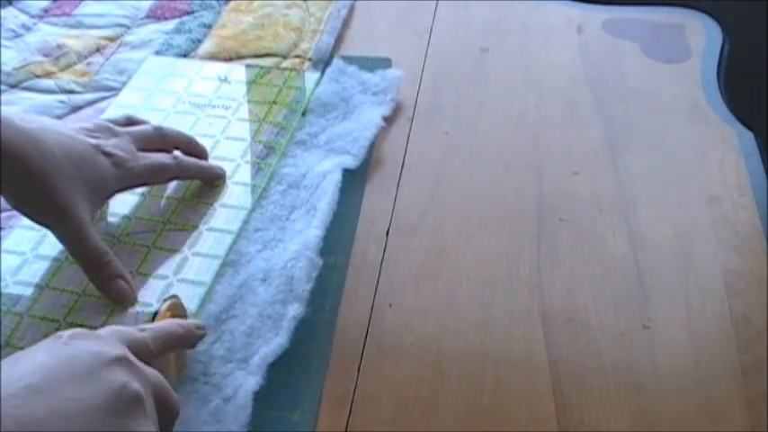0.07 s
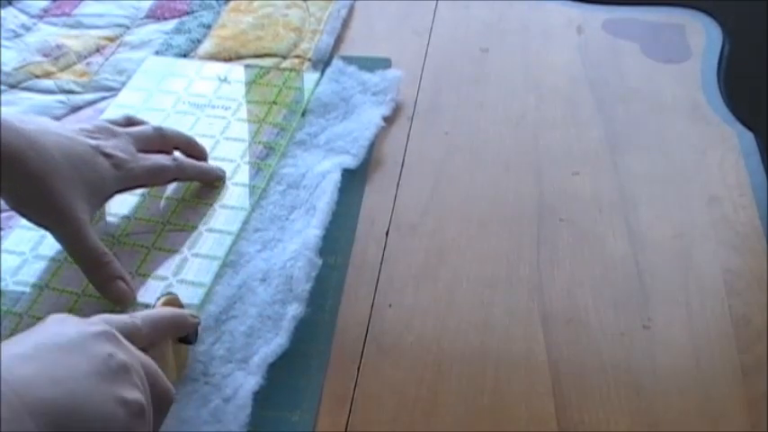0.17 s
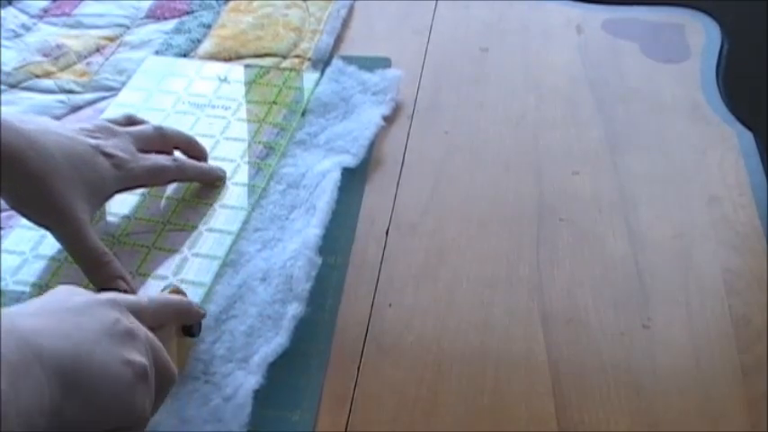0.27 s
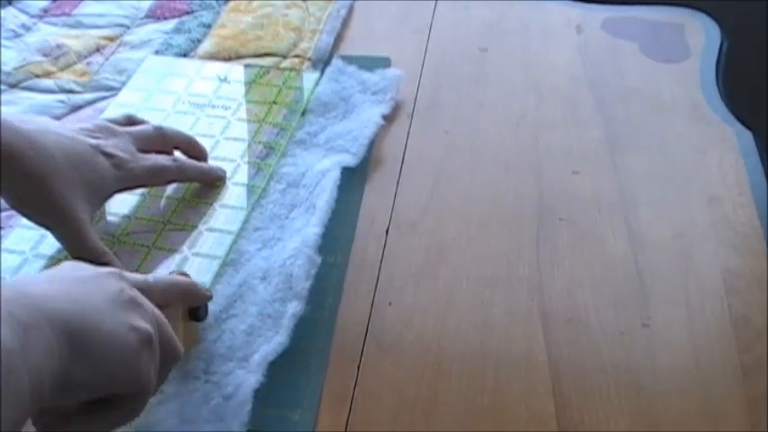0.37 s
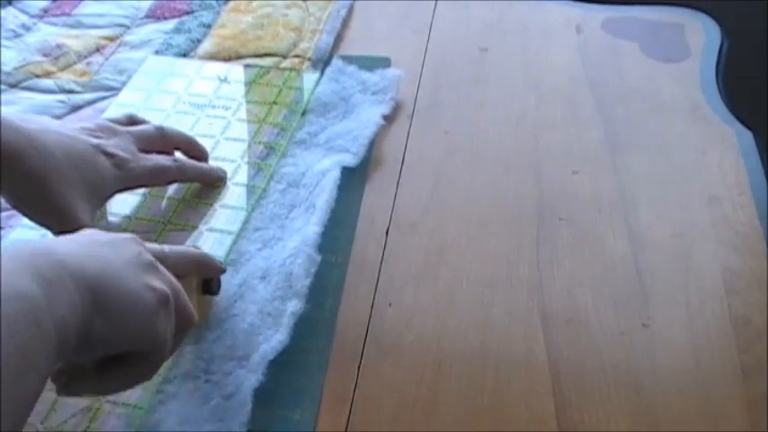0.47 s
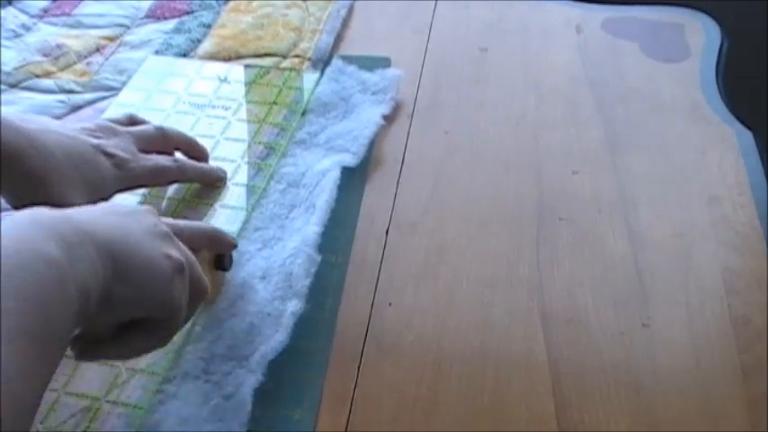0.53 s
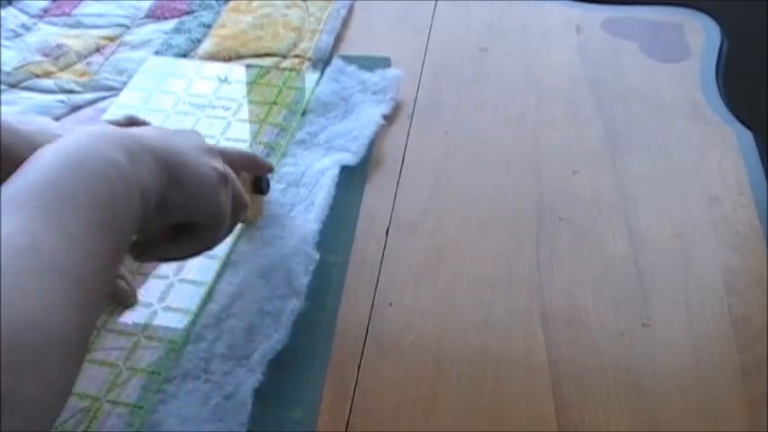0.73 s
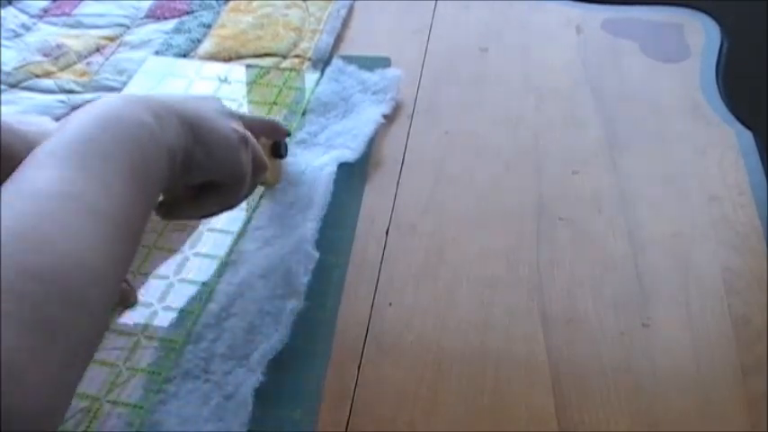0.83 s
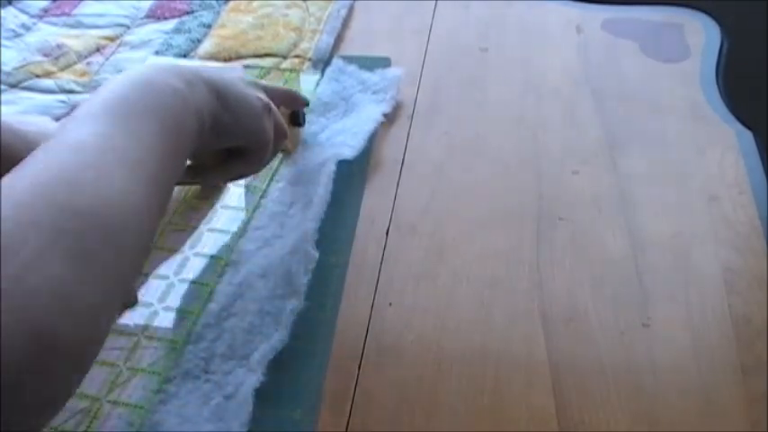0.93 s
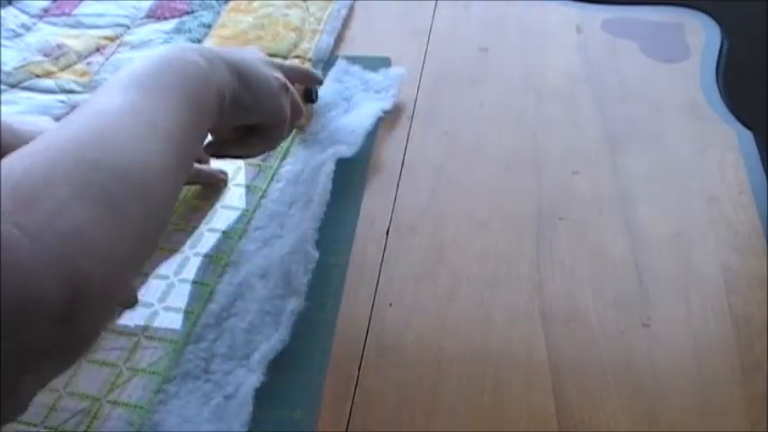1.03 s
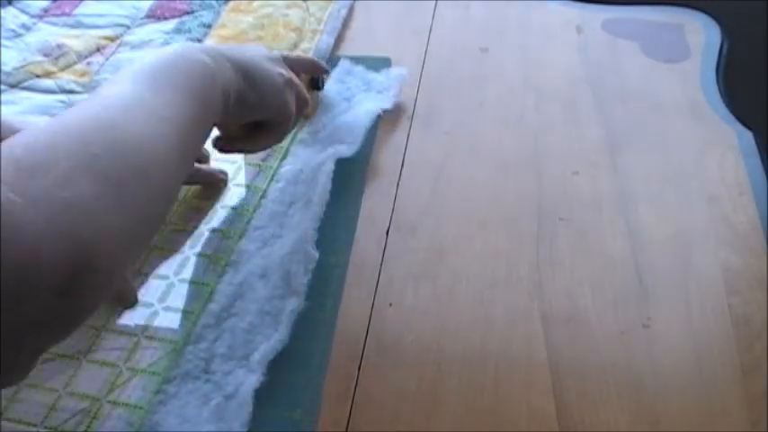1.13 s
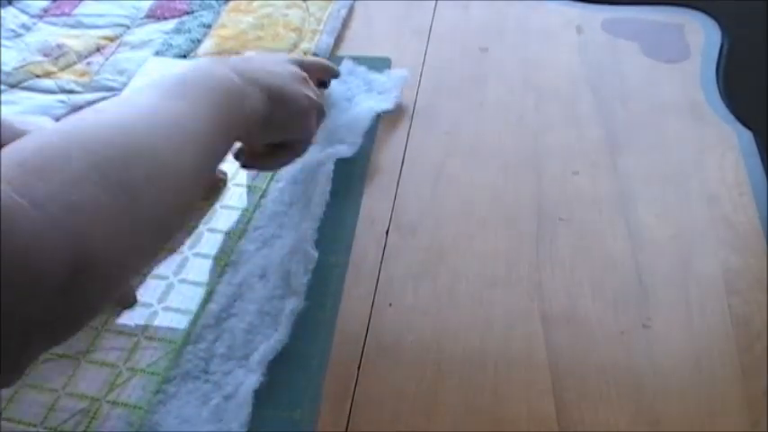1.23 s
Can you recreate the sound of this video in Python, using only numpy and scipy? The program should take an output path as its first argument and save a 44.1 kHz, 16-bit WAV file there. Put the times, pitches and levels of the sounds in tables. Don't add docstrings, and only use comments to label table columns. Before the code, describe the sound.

One rasping rotary cutter stroke: tiny handle ticks, a soft bouncing knock, then gritty fibre snaps ringing ruler and mat before dying away, heard close in a small quiet room with a thin motor whine.

```python
import sys
import numpy as np
from scipy import signal
from scipy.fft import rfft, irfft, next_fast_len
from scipy.io import wavfile
from scipy.ndimage import uniform_filter1d

SR = 44100
rng = np.random.default_rng(int(sys.argv[2]) if len(sys.argv) > 2 else 0)


def invert_db(level):
    return 10 ** (np.asarray(level, dtype=float) / 20)


def master(y):
    cut = np.clip(np.atleast_2d(y).T, -1, 1)
    pcm = np.round(cut * 32767)
    wavfile.write(sys.argv[1], SR, pcm.astype(np.int16))


N = 57330

# t/s, level/dB
KNOCKS = [
    (.2078, -29),
    (0.2219, -39.5),
    (0.2305, -48),
    (0.2422, -45.5),
    (0.2515, -55),
]
EAR_TILT = invert_db(1.07 * np.array([[1], [-1]]))


def evened(x):
    return x / np.sqrt(np.mean(x ** 2) + 1e-20)


def read(points, hz):
    f, value = np.transpose(points)
    return np.interp(np.log(hz + 1), np.log(f + 1), value)


def colour(x, points):
    log_gain = np.log(invert_db(read(points, np.fft.rfftfreq(2048, 1 / SR))))
    full = np.r_[log_gain, log_gain[-2:0:-1]]
    taps = np.fft.ifft(np.exp(np.conj(signal.hilbert(full)))).real
    taps = taps.reshape((1,) * (x.ndim - 1) + (-1,))
    return signal.oaconvolve(x, taps, axes=-1)[..., :N]


def resonate(x, hz, width):
    turn = np.exp(2j * np.pi * np.cumsum(hz * np.ones(len(x))) / SR)
    r = np.exp(-np.pi * width / SR)
    return 2 * (turn * signal.lfilter([1 - r], [1, -r], x / turn)).real


def hiss_band(hz, width):
    noise = rng.standard_normal(N)
    return evened(resonate(resonate(noise, hz, width), hz, width))


def drift(seconds):
    size = max(int(seconds * SR), 2)
    smooth = uniform_filter1d(rng.standard_normal(N), size)
    return evened(uniform_filter1d(smooth, size))


def snaps(per_s, spread_db):
    hit = rng.random(N) < per_s / SR
    size_db = spread_db * np.minimum(rng.exponential(1, N), 3.2)
    return evened(hit * rng.standard_normal(N) * invert_db(size_db))


def burst(s, length):
    t = np.arange(N) / SR - s
    return (t >= 0) * np.exp(-np.maximum(t, 0) / length)


def swell(s, length):
    t = np.arange(N) / SR
    return np.exp(-((t - s) / length * 2) ** 2)


def no_bass(x, cut_hz):
    return signal.sosfilt(signal.butter(2, cut_hz, "high", fs=SR, output="sos"), x)


def air():
    # f/Hz, level/dB
    hiss_curve = [(30, -25), (120, -14), (400, -7.5), (1100, -11), (1500, -17), (3500, -20.5),
                  (7500, -25.5), (15500, -40.5)]
    # f/Hz, likeness (-1 to 1)
    likeness = [(60, -0.41), (240, 0.052), (950, -0.46), (3770, 0.33), (15000, -0.037)]
    hz = np.fft.rfftfreq(N, 1 / SR)
    a, b = rfft(rng.standard_normal((2, N)))
    same = np.clip(read(likeness, hz), -1, 1)
    pair = np.array([a, same * a + np.sqrt(1 - same ** 2) * b])
    hiss = evened(irfft(pair * invert_db(read(hiss_curve, hz)), N))
    whine = invert_db(-68) * hiss_band(1084, 18)
    return invert_db(-57.5) * hiss * EAR_TILT + whine


def room(x):
    # f/Hz, level/dB
    echo_curve = [(200, -13), (1000, -7.5), (3000, -13), (6000, -9), (9000, -5.5), (11500, -6),
                  (14000, -21)]
    t60_s, shared = 0.18, 0.8
    count, gap = SR // 120, 20
    taps = np.zeros((2, count * gap + 100))
    at = 30 + np.arange(count) * gap + rng.integers(0, gap, (2, count))
    np.put_along_axis(taps, at, rng.choice([-1., 1.], at.shape), 1)
    apart = np.sqrt(1 - shared ** 2) * taps[1] * np.array([[1], [-1]])
    taps = shared * taps[0] + apart
    taps *= invert_db(-60 * np.arange(taps.shape[1]) / SR / t60_s)
    taps /= np.linalg.norm(taps[0])
    return colour(signal.fftconvolve(x[None], taps, axes=1)[:, :N], echo_curve)


def ticks():
    # t/s, level/dB, f/Hz, width/Hz
    clicks = [(.0015, -48.5, 5300, 2500), (.0062, -52, 6560, 1800), (.0085, -53, 4630, 900),
              (0.009, -48.5, 7140, 1180), (.06, -55.5, 3320, 2500), (.058, -56, 705, 603),
              (0.078, -59, 5000, 4050), (0.096, -60, 3100, 1230), (0.177, -62, 3330, 1310),
              (1.295, -59.5, 2800, 900), (1.296, -62, 300, 300), (0.218, -52.5, 7050, 2500)]
    return sum(invert_db(db) * burst(s, .0022) * hiss_band(hz, width) for s, db, hz, width in clicks)


def thread():
    click = -invert_db(-19) * (np.arange(N) == round(1.0443 * SR))
    return resonate(click, 4100, 3600) + resonate(click, 2300, 2100)


def squeaks():
    times = [.32, .5, .58, .64, .815, .912, .937, .945, 1.18]
    # length/s, f/Hz, width/Hz, level/dB
    hisses = [(0.093, 7300, 900, -67), (0.23, 7450, 2000, -62), (0.012, 6600, 1400, -59),
              (0.024, 5330, 200, -62), (0.013, 6100, 1160, -49), (0.025, 8900, 1500, -51),
              (0.011, 9240, 1400, -43.5), (0.039, 8000, 4300, -47.5), (0.16, 7800, 4500, -67)]
    return sum(invert_db(db) * swell(s, length) * hiss_band(hz, width)
               for s, (length, hz, width, db) in zip(times, hisses))


def knock():
    # f/Hz, level/dB
    slap_curve = [(150, -12), (400, 11), (700, 5), (1500, 2.5), (2300, 1), (4000, -16), (7000, -8),
                  (10000, -34)]
    # f/Hz, level/dB, time to fall by 60 dB/s
    modes = [(439.4, -8.5, 0.075), (782, -14, 0.058), (616, -34, .07), (906.6, -2, 0.082),
             (1003, -9, 0.052), (1192, -2, 0.038), (1319, -0.5, 0.088), (1754, -5, 0.035),
             (1770, -3, 0.028), (2070, -8, 0.023), (2500, -7.5, 0.029), (3080, -10.5, 0.02)]
    slap_db, slap_s, rise_s = -4, 0.0083, 0.0011
    rise_turns = 0.86
    dull_db = 5.5
    t, out = np.arange(N) / SR, np.zeros(N)
    slap = evened(colour(rng.standard_normal(N), slap_curve))
    for bounce, (s, level_db) in enumerate(KNOCKS):
        u = np.maximum(t - s, 0)
        rise = 1 - np.exp(-u / rise_s)
        out += invert_db(level_db + slap_db - bounce * dull_db / 2) * rise * burst(s, slap_s) * slap
        for (hz, db, t60), turn in zip(modes, rng.random(len(modes))):
            lost_db = bounce * dull_db * max(np.log2(hz / 1000), 0)
            fade = invert_db(level_db + db - lost_db - 60 * u / t60)
            mode_rise = (1 - np.exp(-u * hz / rise_turns)) ** 2
            out += fade * mode_rise * np.sin(2 * np.pi * (hz * u + turn))
    return out


def ruler_and_mat(drive):
    # f/Hz, width/Hz, level/dB with blade near, midway, far
    modes = [(514.5, 68, 7, -7, -5), (631, 32, 2.5, -11, -8), (811.4, 48, 2, 2, -11.5),
             (1180.5, 42, 4, 3, -0.5), (1359, 82, -21, 0, -3), (1800, 66, -3, 5, -1),
             (1933, 105, -11, -3, -0.5), (2500, 197, 2, 8.5, 1.5), (2743, 400, -11, 9, -2.5),
             (3282, 204, -1, 7, -7), (3526, 390, -12, 2, -3)]
    glides = [-0.088, -0.014, 0.011, 0.073, -0.038, 0.017, 0.061, -0.035, 0.08, 0.019, 0.0059]
    # f/Hz, level/dB
    ring_curve = [(100, -10), (300, 6.5), (4000, 0), (7000, -1.5), (12000, -55), (16000, -68)]
    # f/Hz, level/dB
    mat_curve = [(100, -54), (200, -12), (500, 2), (900, 18), (1600, 11.5), (2900, -5.5), (4200, -19),
                 (7000, -25.5)]
    # t/s, length/s, f/Hz, level/dB
    bellies = [(0.45, 0.061, 1300, -5), (0.45, 0.021, 1130, -3), (0.454, 0.013, 3222, 1.5),
               (0.53, 0.055, 2550, 0.5), (0.58, 0.066, 695, -6.5), (0.63, 0.049, 2850, 2.5),
               (0.69, 0.038, 830, -1), (0.679, 0.03, 630, -0.5), (0.684, 0.062, 2850, -0.5),
               (0.681, 0.24, 1795, 2), (0.772, 0.042, 1920, -9.5), (0.76, 0.027, 3320, 1),
               (0.93, 0.02, 1160, -14), (0.839, 0.098, 2486, 2.5), (0.858, 0.024, 1260, -6),
               (0.915, 0.058, 2600, -4), (0.862, 0.016, 2360, -3), (0.66, 0.043, 1173, -3),
               (0.957, 0.059, 2846, -1.5), (0.788, 0.13, 816, -6.5), (0.949, 0.13, 1470, -3),
               (0.967, 0.046, 650, 4), (1.001, 0.033, 1740, 2), (1.038, 0.039, 2003, 4.5),
               (1.2, 0.028, 2350, 2.5), (1.081, 0.043, 1230, 0), (1.083, 0.03, 1020, -5),
               (1.09, 0.03, 1870, -5), (1.168, 0.042, 2450, 1), (1.193, 0.0085, 2760, -3),
               (1.204, 0.055, 1284, -3), (1.235, 0.078, 870, 2.5), (0.26, 0.068, 2400, -2.5)]
    where = np.interp(np.arange(N) / SR, [0.13, 0.95], [0, 2])
    bend = 1 + 0.017 * drift(0.045)
    ring = np.zeros(N)
    for k, (hz, width, *dbs) in enumerate(modes):
        gain = invert_db(np.interp(where, range(3), dbs) + 0.8 * drift(0.043))
        pitch = hz * (bend + glides[k] * (where - 1) / 2)
        ring += (-1) ** k * gain * resonate(drive, pitch, width) / np.sqrt(width)
    body = evened(colour(ring, ring_curve)) + invert_db(-5) * evened(colour(drive, mat_curve))
    body *= np.std(drive) / np.std(body)
    width = 210
    for at, length, hz, db in bellies:
        tone = resonate(resonate(drive, hz, width), hz, width) * np.sqrt(SR / width / np.pi)
        body += invert_db(db) * swell(at, length) * tone
    return body


def cutter():
    # t/s, cutting effort level/dB, fibre fizz above effort/dB
    roll = [(.25, -61.5, -6), (.3, -51, -7.5), (0.394, -48.5, -10.5), (.41, -44, -9), (.494, -42.5, -14),
            (.51, -44.5, -6), (0.556, -39, -4), (.58, -37, -1), (0.621, -38.5, -8), (.636, -40.5, -5.5),
            (.678, -36.5, -6), (0.718, -37.5, -2.5), (.954, -37.5, -4.5), (1.02, -38, -4),
            (1.101, -40, -6.5), (1.124, -51.5, -8.5), (1.201, -54, -1), (1.271, -70, -5)]
    # t/s, peak level/dB, treble above peak/dB
    catches = [(0.375, -52, -7), (0.3876, -49, -12), (0.403, -39, -12), (0.4326, -32, -21),
               (0.451, -25, -1), (0.474, -30, 5), (0.486, -19, -9), (0.546, -22, -1), (0.582, -28, -5),
               (0.600, -25, -12), (0.614, -19, -16), (0.619, -25.5, 0), (0.669, -20, -8),
               (0.696, -25.5, -16), (0.731, -19, -14), (0.7522, -24, 6), (0.763, -19.5, -22),
               (0.7847, -17.5, -10), (0.8127, -30, -5), (0.826, -28, -10), (0.846, -37, -13),
               (0.861, -21.5, -2.5), (0.929, -17, 0.5), (1.03, -23.5, 0), (1.034, -22, 3), (1.047, -28, -5),
               (1.072, -21.5, -22), (1.088, -29, -12), (1.095, -29, -11), (1.158, -39, -15),
               (1.181, -31.5, -12), (1.1895, -36, 4.5)]
    # f/Hz, level/dB
    fizz_curve = [(3500, -0.5), (4600, -7), (7000, -7.5), (8300, -12), (9500, -15), (11000, -21.5),
                  (13500, -27), (15000, -61)]
    catch_db, catch_s = -14.5, .005
    t = np.arange(N) / SR
    s, effort_db, fizz_db = np.transpose(roll)
    effort = invert_db(np.interp(t, s, effort_db)) * (t > KNOCKS[0][0])
    grit, crack = rng.standard_normal((2, N))
    low = sum(invert_db(db + catch_db) * burst(at, catch_s) for at, db, _ in catches)
    high = sum(invert_db(db + rel_db + catch_db) * burst(at, catch_s / 2) for at, db, rel_db in catches)
    drive = effort * snaps(4800, 2.5) + low * grit
    tear = effort * invert_db(np.interp(t, s, fizz_db)) * snaps(8000, 2.2) + high * crack
    fizz = evened(colour(tear, [(500, -99), (1800, -7.0)] + list(fizz_curve)))
    return ruler_and_mat(drive) + np.std(tear) * fizz


def scene():
    # f/Hz, level/dB
    small_sounds_curve = [(100, 8), (10500, 5), (13000, -21), (16000, -25)]
    # f/Hz, level/dB
    lean = [(100, 2), (300, 3.2), (1000, 2), (4000, 1.6), (8500, -1.6), (15000, 0)]
    # f/Hz, phase/rad
    lead = [(100, 0.066), (5500, -0.035), (7500, -0), (8500, 1), (9800, 0.85), (12000, 0.3)]
    table = cutter() + knock() + colour(squeaks() + ticks() + thread(), small_sounds_curve)
    table = no_bass(table, 230)
    size = next_fast_len(N + 4096)
    hz = np.fft.rfftfreq(size, 1 / SR)
    half = invert_db(read(lean, hz) / 2) * np.exp(.5j * read(lead, hz))
    direct = irfft(rfft(table, size) * np.array([half, 1 / half]), size)[:, :N]
    return direct + room(table) * EAR_TILT + air()


def top_cut(x):
    return signal.sosfilt(signal.butter(12, 15610, fs=SR, output="sos"), x)


def record(dry):
    mix = no_bass(dry, 104)
    return top_cut(mix)


dry = scene()
out = record(dry)
master(out)
```